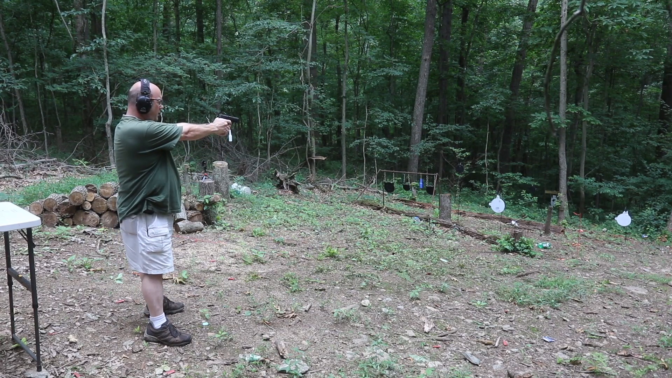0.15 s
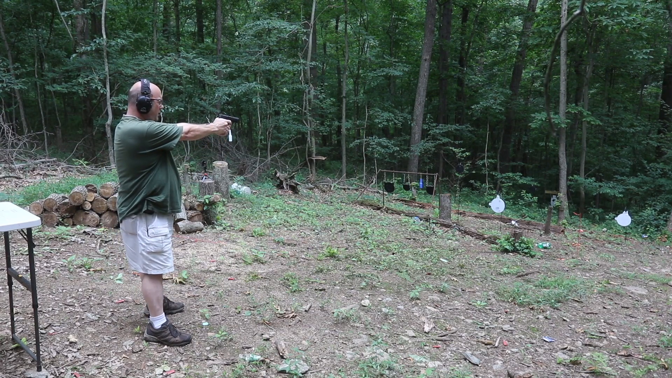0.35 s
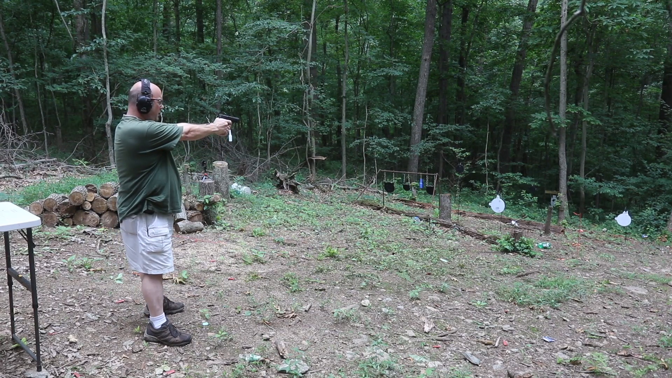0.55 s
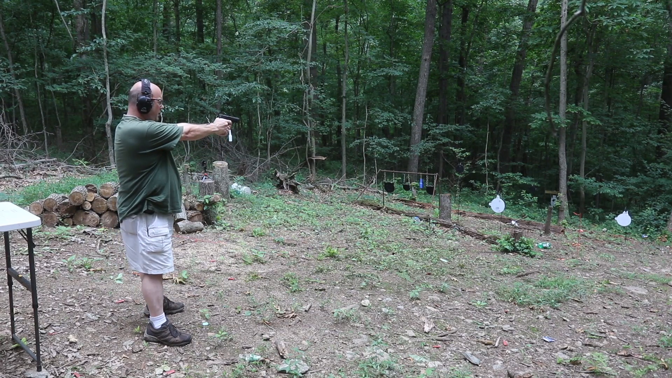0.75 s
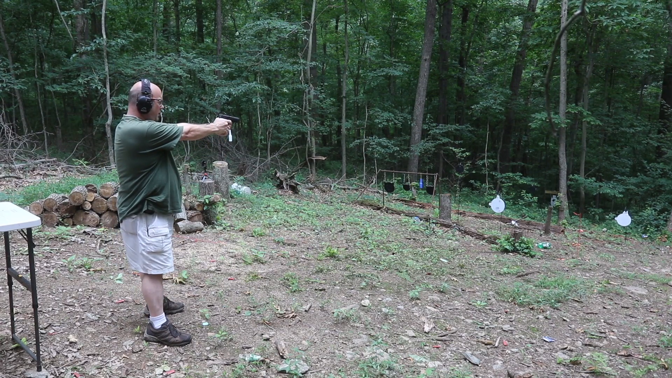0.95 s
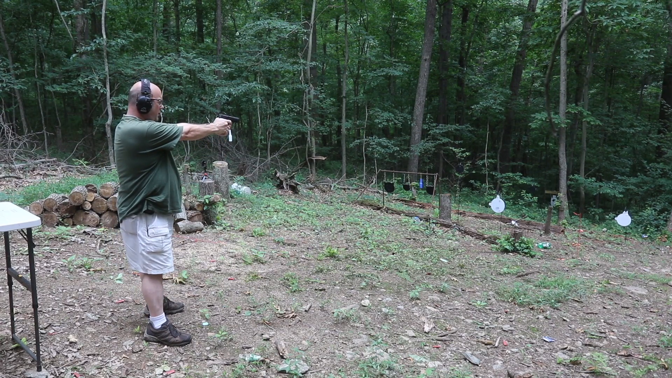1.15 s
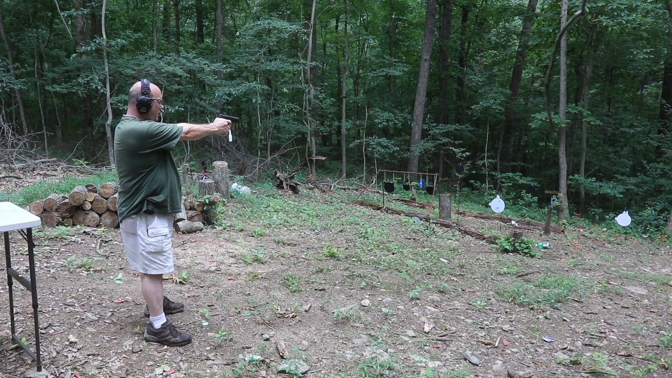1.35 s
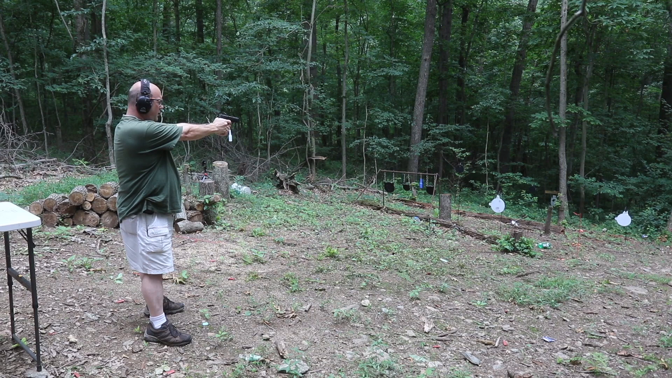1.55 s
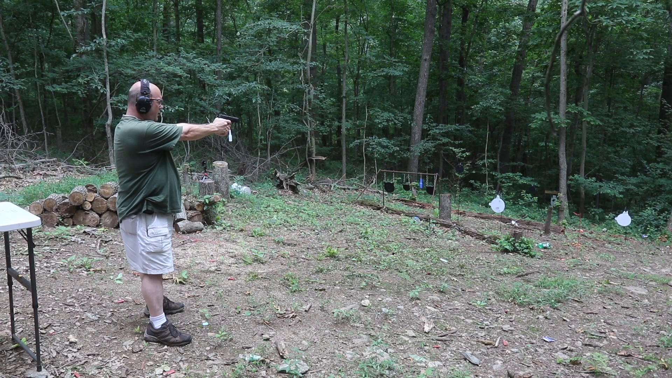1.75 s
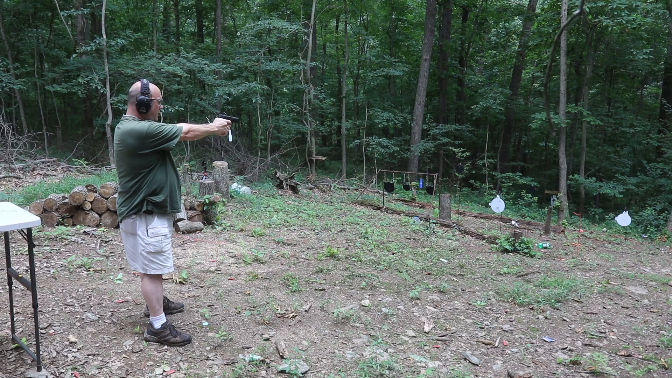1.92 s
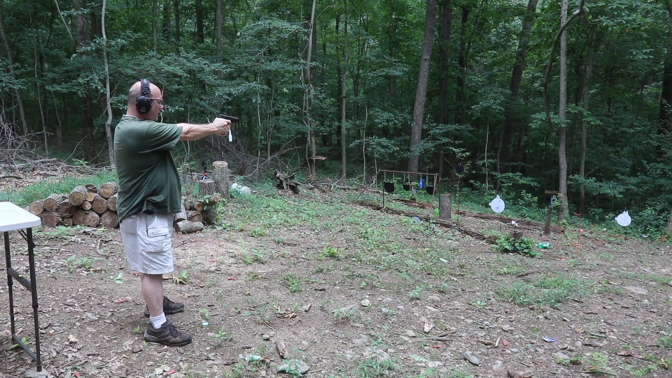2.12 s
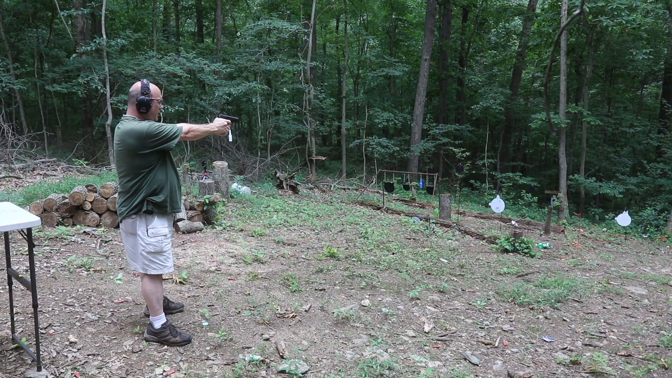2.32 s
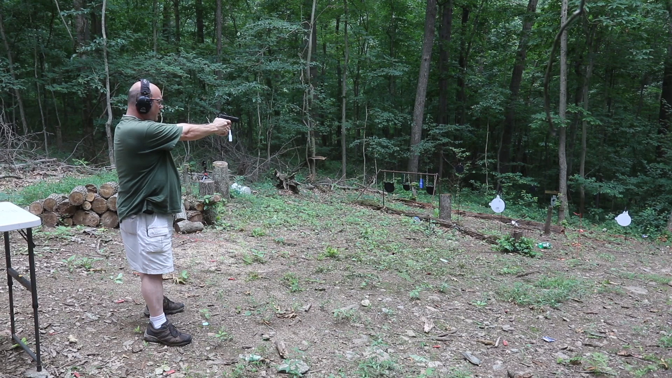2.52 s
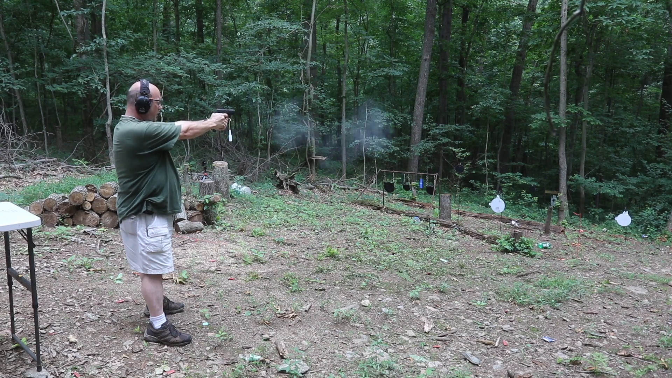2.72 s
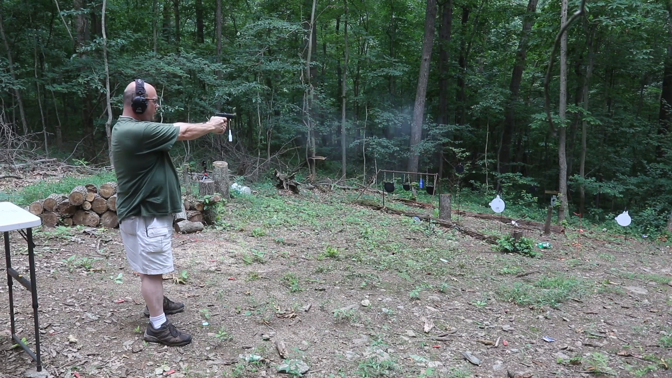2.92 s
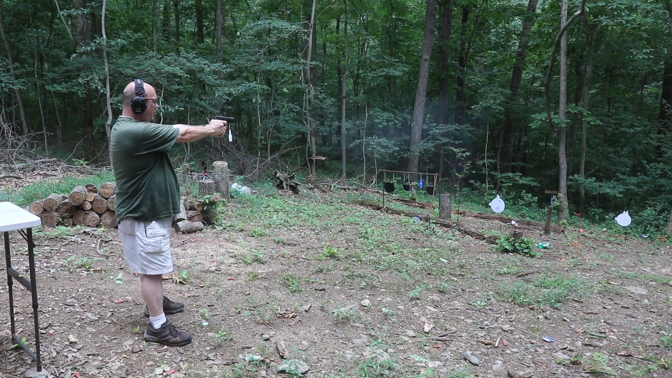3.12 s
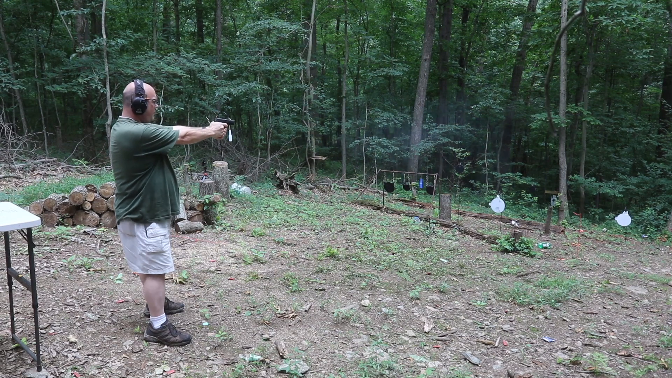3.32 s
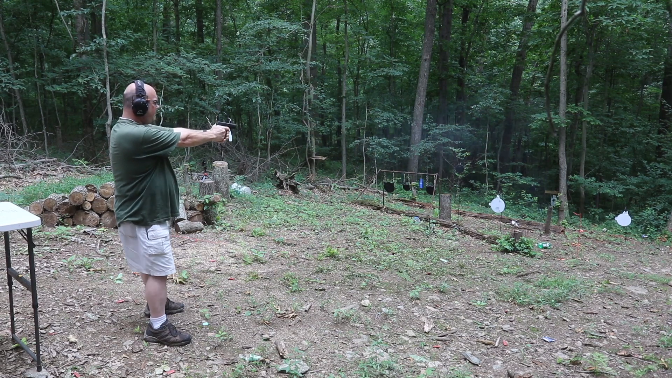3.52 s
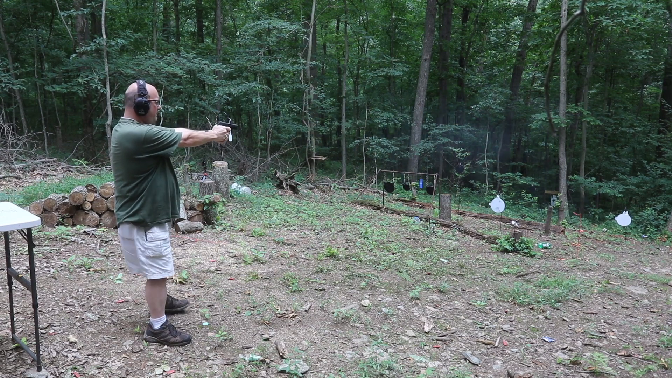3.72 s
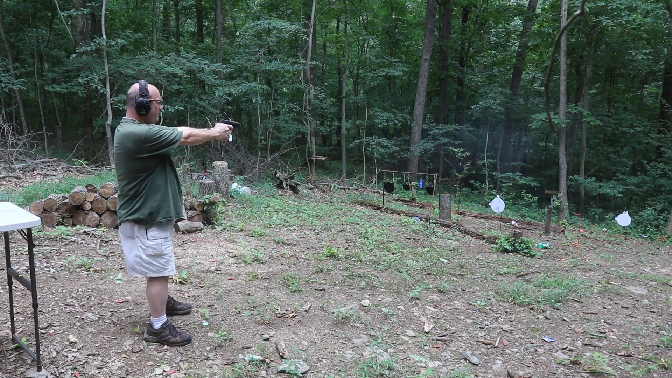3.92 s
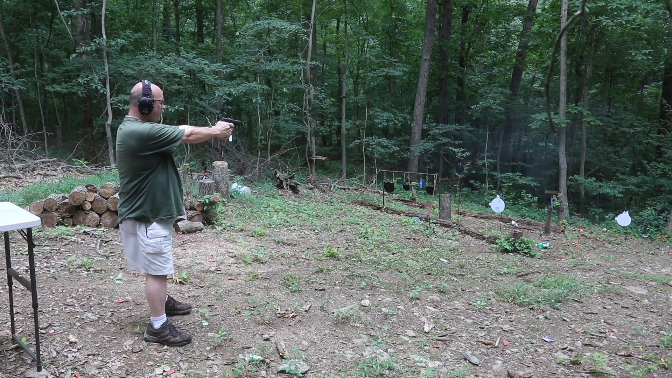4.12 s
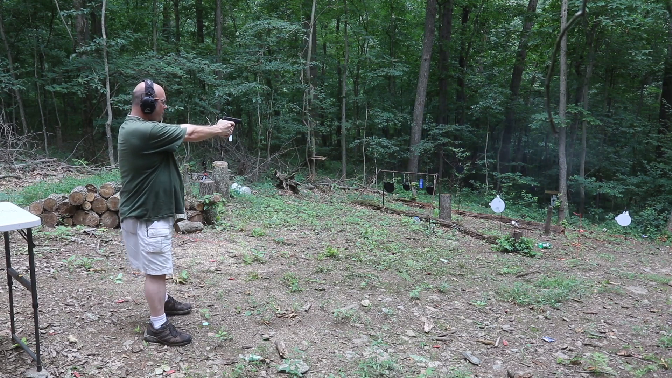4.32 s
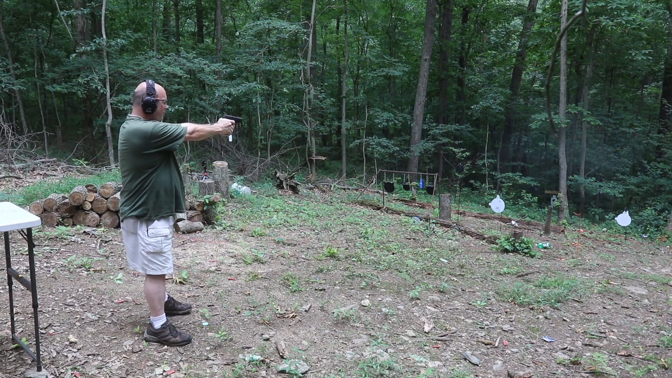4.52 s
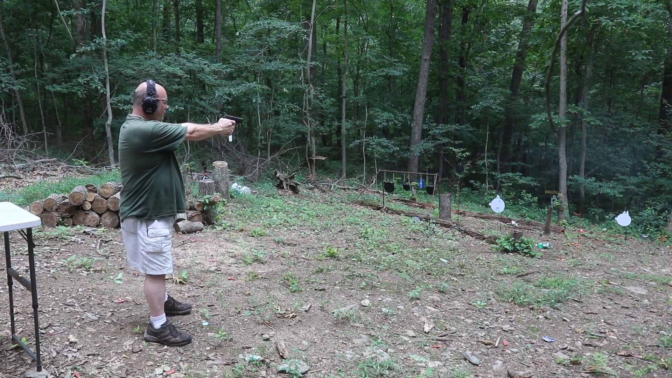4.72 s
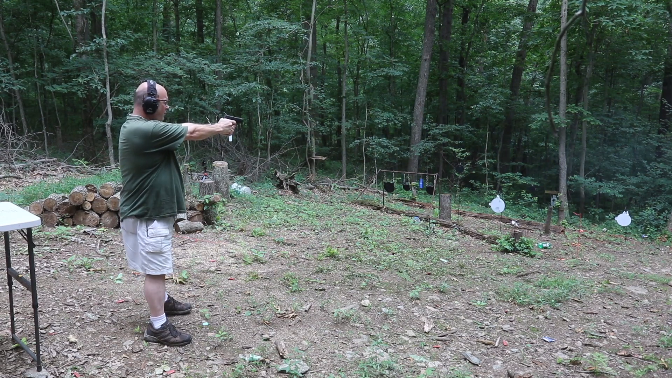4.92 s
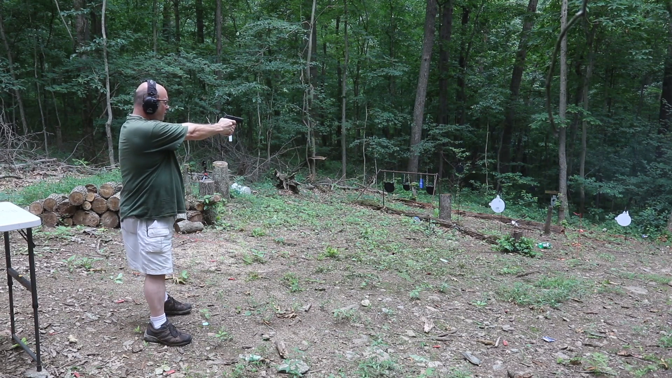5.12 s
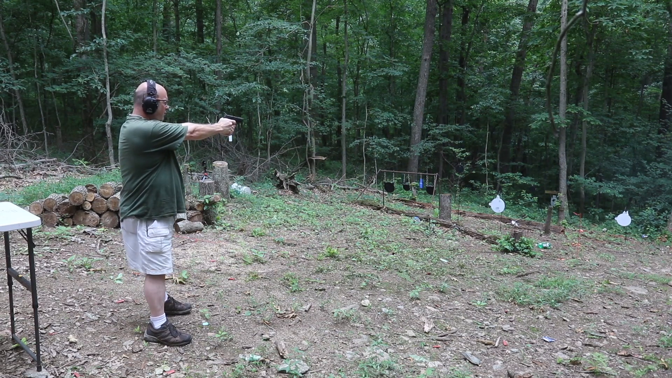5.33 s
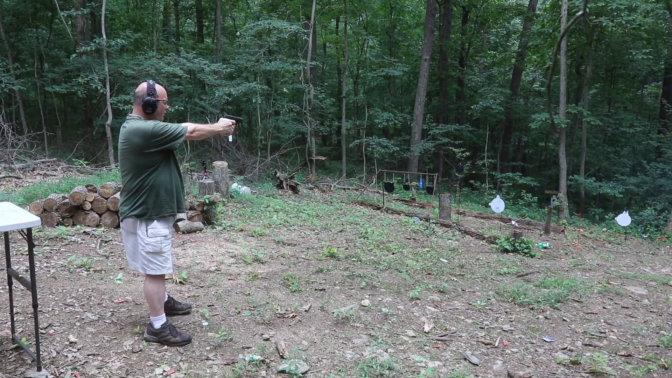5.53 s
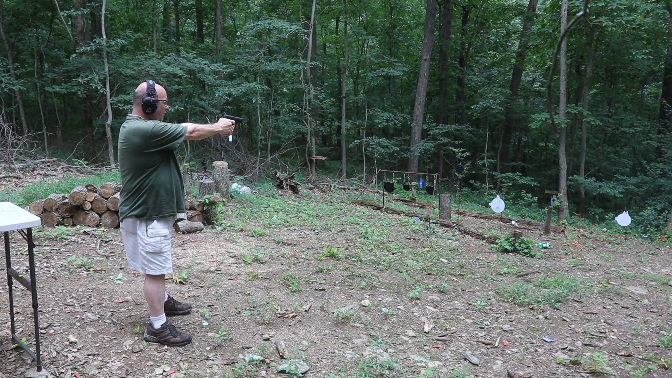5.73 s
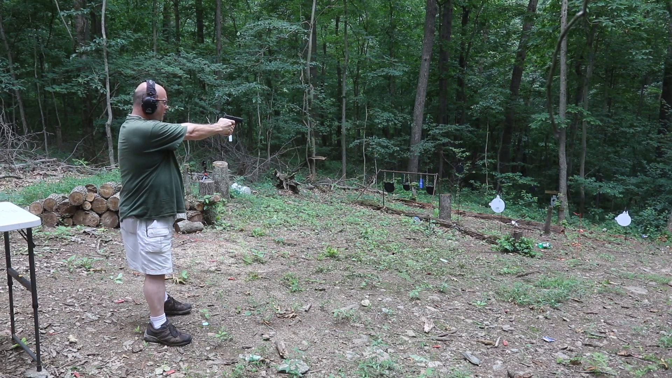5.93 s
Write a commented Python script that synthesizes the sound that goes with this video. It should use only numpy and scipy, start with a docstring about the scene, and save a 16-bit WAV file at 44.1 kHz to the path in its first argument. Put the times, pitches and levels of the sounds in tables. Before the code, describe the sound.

Outdoors in woods, leaves hiss softly with faint insects and a few distant bird chirps. Before three seconds one pistol shot bursts out, overloading the microphone, and its dense echo rolls through the trees, losing treble as it fades. A spent case ticks and tinkles down shortly after, again about a second later. The breeze swells and birds chirp near the end. Mono.

```python
"""Pistol shot in a wooded clearing

Leaves hiss, insects shimmer and far birds chirp: filtered noises and short gliding sines.
One shot, a push and pull of pressure, overloads the input; the wood throws it back as a long roll
that loses its treble first, made of noise bands dying at their own rates.
The spent case then tinkles down: clicks that set bright, damped sines ringing."""
import sys
import numpy as np
from scipy import signal
from scipy.io import wavfile

SR = 44100
rng = np.random.default_rng(int(sys.argv[2]) if len(sys.argv) > 2 else 0)


def invert_db(x):
    """Field ratio 10**(x/20) for x, a level in decibels (scalar or array-like)."""
    u = np.asarray(x, float) / 20
    return 10 ** u


def wrap_up_sound(samples):
    """Save the sound to the file named by the first command line argument, as 16-bit audio."""
    columns = np.atleast_2d(samples).T
    # keep every value between -1 and 1, then stretch to whole-number steps
    tamed = np.clip(columns, -1, 1)
    steps = np.round(tamed * 32767).astype(np.int16)
    wavfile.write(sys.argv[1], SR, steps)


N = 262836  # length in samples

# Whistles of far birds. Each row: start in seconds, length in seconds, first pitch in Hz, last pitch in Hz,
# rms level in dB.
BIRD_CHIRPS = [(0.0, 0.045, 3100, 2690, -52), (0.063, .05, 2500, 2510, -57), (.76, 0.03, 2700, 2880, -58.5),
               (1.61, 0.056, 2700, 2660, -59), (1.862, 0.056, 3920, 3700, -62.5),
               (1.904, 0.072, 2670, 3100, -55.5), (2.513, 0.072, 3950, 3950, -63),
               (5.628, .025, 2980, 2760, -58), (5.668, 0.037, 2840, 2860, -53),
               (5.731, 0.036, 2890, 2900, -55)]
# Colour of the leaves and far air. Each row: frequency in Hz, relative density in dB per Hz.
LEAF_SPECTRUM = [(25, -13.5), (60, -1), (150, -1), (300, -1.5), (600, -6), (1200, -9), (2200, -13),
                 (3200, -19), (4300, -18.5), (6500, -24), (9000, -30.5), (12000, -37), (16000, -40.5)]
# The breeze lifts the rustle, not the far rumble. Each row: time in seconds, treble swell in dB.
BREEZE_SWELL = [(0, -0.2), (1.3, 0.9), (2.6, 3), (4, 9.5), (5.96, 4.5)]
# Brief swells of the insect chorus. Each row: peak time in seconds, rise in dB.
CHORUS_SWELLS = [(.8, 7), (5.5, 7)]
# The ground's echo cancels the first arrivals. Each row: frequency in Hz, level change in dB.
GROUND_CANCELLATION = [(250, -2), (480, -10.5), (800, -9), (1050, -2)]
# What the near trunks throw back at first. Each row: frequency in Hz, band level in dB.
NEAR_TRUNKS = [(40, 0), (130, 3.5), (200, 2), (260, 10.5), (352, 6.5), (576, 16.5), (837, 18), (1205, 11),
               (1544, 5), (2140, 6.5), (3000, 2), (6160, 3), (10000, -8), (15000, -17)]
# What the far slopes throw back at first. Each row: frequency in Hz, band level in dB.
FAR_SLOPES = [(40, -46), (130, -24.5), (210, -24.5), (290, -8), (352, 0.5), (576, 2.5), (837, 5.5),
              (1205, -3), (1544, -1.5), (2300, -3), (2800, -9.5), (4200, 2), (6160, -20), (15000, -39)]
# The spent case landing and bouncing. Each row: time in seconds, tick level in dB, ring level in dB.
CASE_BOUNCES = [(3.316, -20, -58), (3.362, -38, -57), (3.41, -36, -54), (3.422, -58, -51), (3.45, -58, -52),
                (4.113, -53, -52), (4.139, -45, -43), (4.18, -62, -52)]
# Ringing modes of the brass. Each row: frequency in Hz, level relative to the ring in dB,
# time to fall 60 dB in seconds.
BRASS_MODES = [(10200, -5, 0.23), (10125, -17, .3), (12700, -19, .015)]

ARCH_HZ = 121  # every whistle arches this far above its glide
CHIRP_ECHO_DB, CHIRP_ECHO_T60_S = -2, 0.4
LEAVES_DB, RUSTLE_FROM_HZ, RUSTLE_FULL_HZ = -46.5, 360, 3520  # level before the breeze
INSECT_DB, INSECT_LOW_HZ, INSECT_HIGH_HZ, INSECT_SWELL_S = -65, 3400, 4600, 0.2  # level between swells
SHOT_S, BLAST_DB, PUSH_MS = 2.6644, 32.5, 0.36
# An echo fades as sound escapes the wood; air and leaves take more per kHz, thin trunks let the bass through.
NEAR_FADE_DB_PER_S, NEAR_TREBLE_DB_PER_S_PER_KHZ = 50, 1.5
BASS_LEAK_DB_PER_S, TRUNK_HZ = 114, 253
FAR_FADE_DB_PER_S, FAR_TREBLE_DB_PER_S_PER_KHZ = 14, 7
TREELINE_S, FAR_RISE_S, GROUND_RELEASE_S = 0.08, 0.035, 0.015
# Spread of the echo's unevenness: fine grain, roll shared by all bands, roll of each band.
GRAIN_DB, SHARED_ROLL_DB, BAND_ROLL_DB = 0.7, 0.077, 0.69
TICK_HZ, TICK_T60_S = 12400, 0.003
CHATTER_S, CHATTER_LOSS_DB = 0.005, 10  # spacing and loss of the two chatters after each bounce
KNEE_DB, SQUEEZE_DB_PER_DB, MOST_CUT_DB, GAIN_SMOOTHING_S = -36, 0.36, 12, 0.12
CLIP_LEVEL, CLIP_HARDNESS = 0.5, 30
COUPLING_HZ, CUTOFF_HZ = 14, 16200


def rms_one(x):
    """Scales a signal to an rms of 1."""
    return x / np.sqrt(np.mean(x ** 2) + 1e-20)


def level_at(hz, points):
    """Reads a table of frequency and dB along log frequency."""
    table_hz, db = np.transpose(points)
    return np.interp(np.log(hz), np.log(table_hz), db)


def drift(rate_hz):
    """Slow chance with spread 1: noise through two equal low-pass poles, computed every 40 samples."""
    r = np.exp(-2 * np.pi * rate_hz * 40 / SR)
    noise = rng.standard_normal(N // 40 + 2002)
    slow = signal.lfilter([1], [1, -2 * r, r * r], noise)[2000:]  # skip the settling
    return np.interp(np.arange(N) / 40, np.arange(len(slow)), rms_one(slow))


def bands(noises):
    """Steep slices, 2.5 an octave, of two unrelated noises dealt in turn; each slopes down as treble does."""
    edges = 22 * 2 ** np.arange(0, 9.7, 0.4)
    corner_hz = 4000
    slope = signal.butter(1, corner_hz, fs=SR, output="sos")
    for k, (low, high) in enumerate(zip(edges, edges[1:])):
        slicer = signal.butter(3, [low, high], "band", fs=SR, output="sos")
        hz = np.sqrt(low * high)
        # make good the slope's loss at the band's centre
        makeup = np.hypot(1, np.tan(np.pi * hz / SR) / np.tan(np.pi * corner_hz / SR))
        yield hz, signal.sosfilt(np.vstack([slicer, slope]), noises[k % 2]) * makeup


def birds():
    """Short arching whistles, each a gliding sine, with a diffuse echo that hangs among the trees."""
    whistles = np.zeros(N)
    for start_s, length_s, first_hz, last_hz, db in BIRD_CHIRPS:
        n, i = int(length_s * SR), int(start_s * SR)
        along = np.linspace(0, 1, n)
        hz = first_hz + (last_hz - first_hz) * along + ARCH_HZ * np.sin(np.pi * along)
        tone = np.sqrt(2) * np.sin(2 * np.pi * np.cumsum(hz) / SR)
        whistles[i:i + n] += invert_db(db) * np.hanning(n) ** 0.12 * tone
    echo_s = np.arange(SR // 2) / SR
    trees = rng.standard_normal(SR // 2) * invert_db(-60 * echo_s / CHIRP_ECHO_T60_S)
    trees = trees / np.sqrt(np.sum(trees ** 2))
    echo = signal.fftconvolve(whistles, trees)[:N] * invert_db(CHIRP_ECHO_DB)
    flutter = invert_db(1.5 * drift(50))  # from foliage on the way
    return whistles * flutter + echo


def leaves():
    """Broad soft hiss of leaves and far air: noise bands that each waver a little, the treble riding the breeze."""
    swell_s, swell_points_db = np.transpose(BREEZE_SWELL)
    swell_db = np.interp(np.arange(N) / SR, swell_s, swell_points_db)
    hiss, still_power = 0, 0
    for hz, band in bands(rng.standard_normal((2, N))):
        breeze_share = np.interp(np.log(hz), np.log([RUSTLE_FROM_HZ, RUSTLE_FULL_HZ]), [0, 1])
        band = band * invert_db(level_at(hz, LEAF_SPECTRUM) + 0.5 * drift(1.1))
        still_power += np.mean(band ** 2)
        hiss = hiss + band * invert_db(breeze_share * swell_db)
    return hiss / np.sqrt(still_power) * invert_db(LEAVES_DB)


def insects():
    """A soft band of noise that shimmers by chance, with brief swells of the chorus."""
    band = signal.butter(2, [INSECT_LOW_HZ, INSECT_HIGH_HZ], "band", fs=SR, output="sos")
    t = np.arange(N) / SR
    swells_db = sum(db * np.exp(-((t - s) / INSECT_SWELL_S) ** 2) for s, db in CHORUS_SWELLS)
    chorus = rms_one(signal.sosfilt(band, rng.standard_normal(N)))
    return chorus * invert_db(INSECT_DB + swells_db + 1.9 * drift(15))


def blast():
    """The muzzle wave: a sudden push, then a longer, weaker pull."""
    t = np.maximum(np.arange(N) / SR - SHOT_S, 0) * 1000 / PUSH_MS  # in push lengths
    return invert_db(BLAST_DB) * (t > 0) * (1 - t) * np.exp(-t)


def wood_echo():
    """Countless trunks scatter the blast: uneven echoes die band by band, the tree line answers after a pause."""
    t = np.arange(N) / SR - SHOT_S
    after = np.maximum(t, 0)
    grains = rng.standard_normal((2, N)) * invert_db(GRAIN_DB * drift(40))
    shared_roll = drift(18)
    ground = np.clip(1 - (t - TREELINE_S) / GROUND_RELEASE_S, 0, 1)
    far_rise = 1 - np.exp(-np.maximum(t - TREELINE_S, 0) / FAR_RISE_S)
    echo = 0
    for hz, band in bands(grains):
        khz = hz / 1000
        bass_leak = BASS_LEAK_DB_PER_S / (1 + (hz / TRUNK_HZ) ** 4)
        near_fade = NEAR_FADE_DB_PER_S + NEAR_TREBLE_DB_PER_S_PER_KHZ * khz + bass_leak
        near = invert_db(level_at(hz, NEAR_TRUNKS) - near_fade * after + level_at(hz, GROUND_CANCELLATION) * ground)
        far_fade = FAR_FADE_DB_PER_S + FAR_TREBLE_DB_PER_S_PER_KHZ * khz
        far = invert_db(level_at(hz, FAR_SLOPES) - far_fade * after) * far_rise
        roll = invert_db(SHARED_ROLL_DB * shared_roll + BAND_ROLL_DB * drift(5.4))
        echo = echo + rms_one(band) * np.hypot(near, far) * roll
    return echo * (t > 0)


def ring(clicks, hz, t60_s):
    """A damped resonator: a unit click sets a sine of height 1 ringing."""
    r, w = invert_db(-60 / (t60_s * SR)), 2 * np.pi * hz / SR
    return signal.lfilter([0, np.sin(w)], [1, -2 * r * np.cos(w), r * r], clicks + 1e-18)


def spent_case():
    """Each bounce is a bright tick with two fainter ones behind, and sets the brass modes ringing."""
    bounce_s, tick_db, ring_db = np.transpose(CASE_BOUNCES)
    ticks, knocks = np.zeros((2, N))
    for k in range(3):
        at = ((bounce_s + k * CHATTER_S) * SR).astype(int)
        ticks[at] = invert_db(tick_db - k * CHATTER_LOSS_DB)
    knocks[(bounce_s * SR).astype(int)] = invert_db(ring_db)
    brass = sum(invert_db(db) * ring(knocks, hz, t60_s) for hz, db, t60_s in BRASS_MODES)
    return ring(ticks, TICK_HZ, TICK_T60_S) + brass


def scene():
    """Everything at the microphone, in one channel."""
    return (birds() + leaves() + insects() + blast() + wood_echo() + spent_case())[None]


def band_limit(x):
    """A steep low-pass at the top of the band."""
    return signal.sosfilt(signal.butter(12, 16800, fs=SR, output="sos"), x)


def record(dry):
    """Gain control turns loud sound down, the input clips hard, a coupling capacitor tilts the flat tops."""
    r = np.exp(-1 / (GAIN_SMOOTHING_S * SR))
    power = signal.lfilter([1 - r], [1, -r], np.minimum(dry ** 2, 1))
    over_db = 10 * np.log10(power + 1e-12) - KNEE_DB
    cut_db = np.clip(SQUEEZE_DB_PER_DB * over_db, 0, MOST_CUT_DB)
    drive = dry * invert_db(-cut_db) / CLIP_LEVEL
    clipped = CLIP_LEVEL * drive / (1 + np.abs(drive) ** CLIP_HARDNESS) ** (1 / CLIP_HARDNESS)
    coupled = signal.lfilter(*signal.butter(1, COUPLING_HZ, "high", fs=SR), clipped)
    # steep low-pass, 60 dB down from the cutoff upward
    low_pass = signal.cheby2(16, 60, CUTOFF_HZ, fs=SR, output="sos")
    mix = signal.sosfilt(low_pass, coupled)
    return band_limit(mix)


dry = scene()
out = record(dry)
wrap_up_sound(out)
```